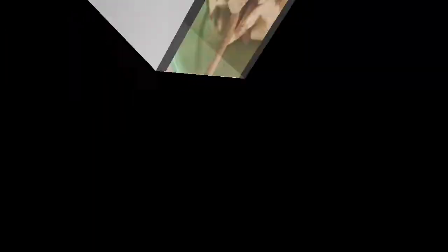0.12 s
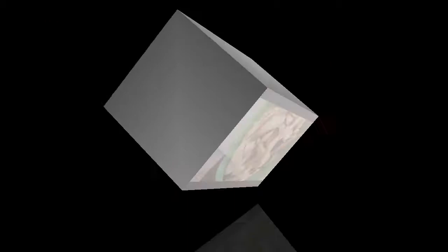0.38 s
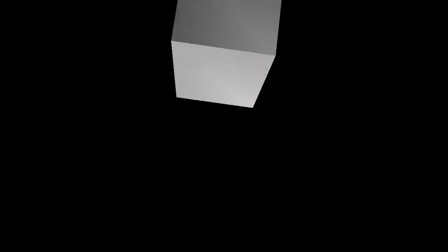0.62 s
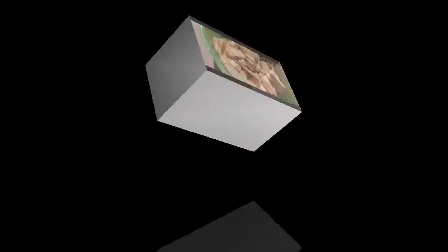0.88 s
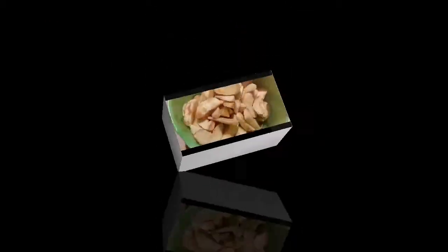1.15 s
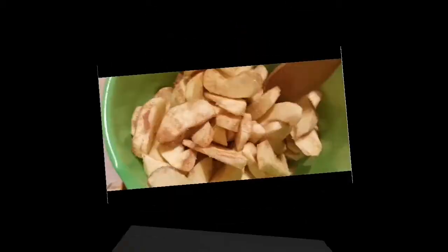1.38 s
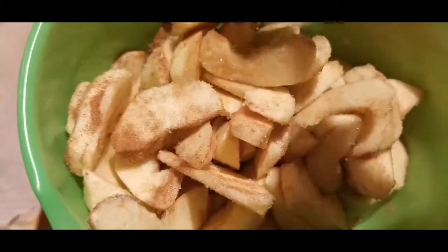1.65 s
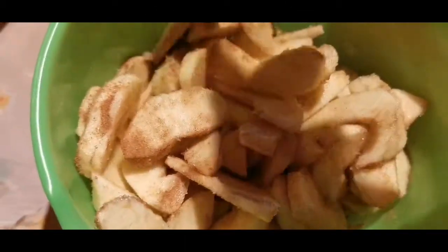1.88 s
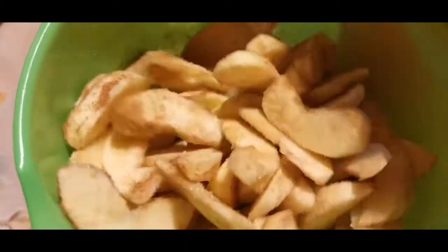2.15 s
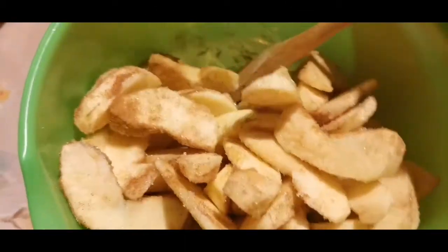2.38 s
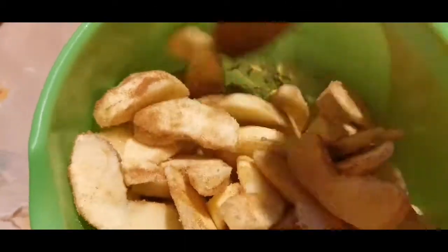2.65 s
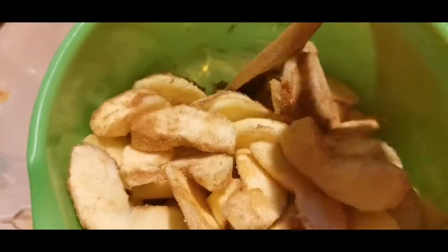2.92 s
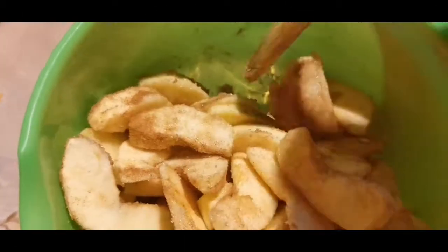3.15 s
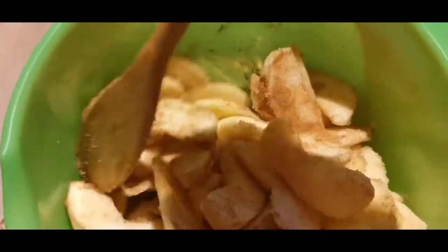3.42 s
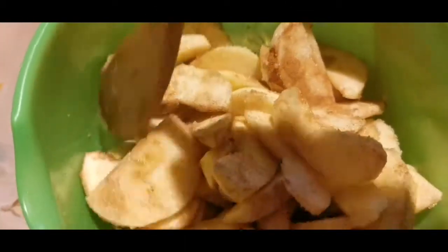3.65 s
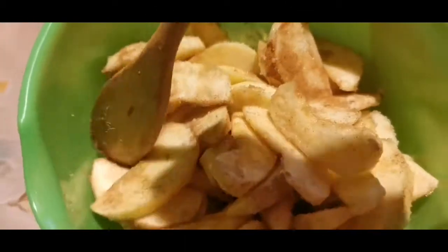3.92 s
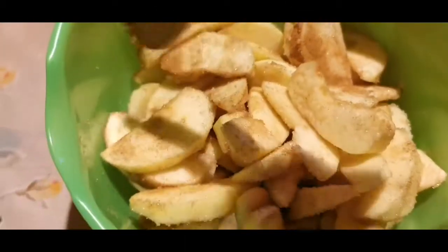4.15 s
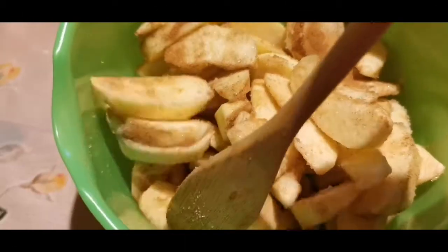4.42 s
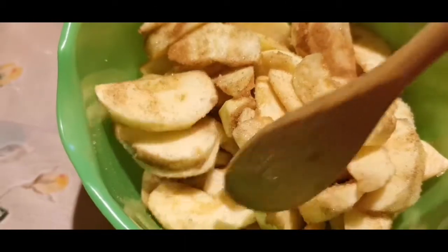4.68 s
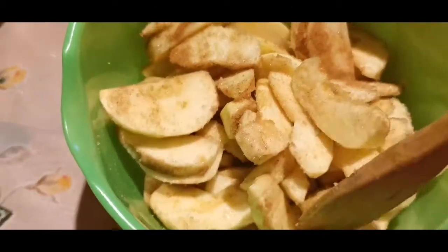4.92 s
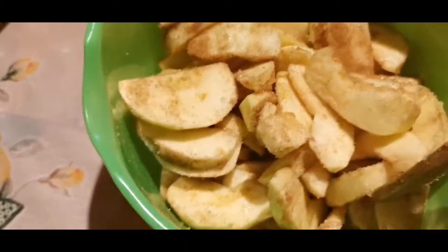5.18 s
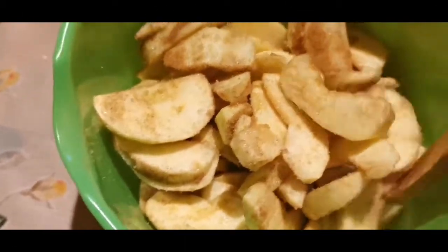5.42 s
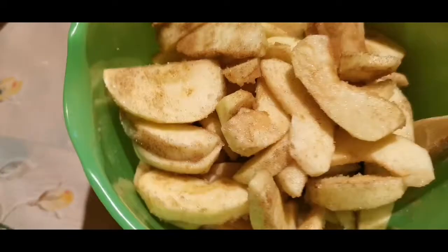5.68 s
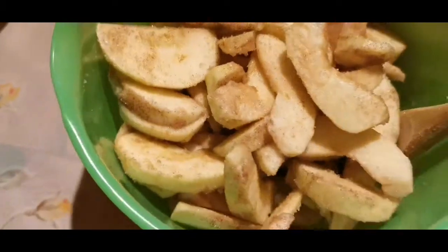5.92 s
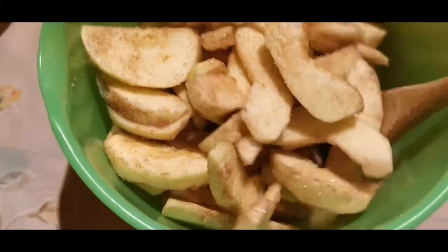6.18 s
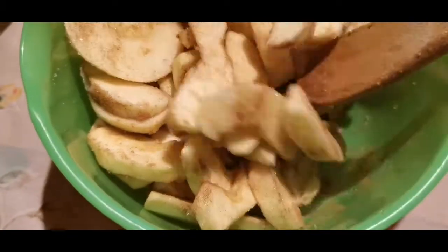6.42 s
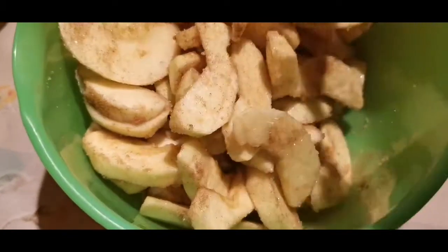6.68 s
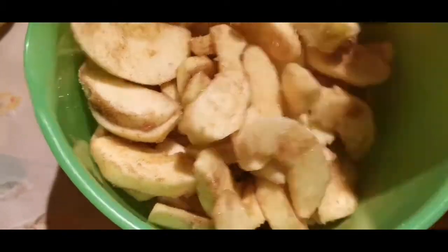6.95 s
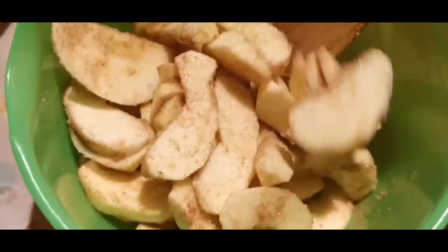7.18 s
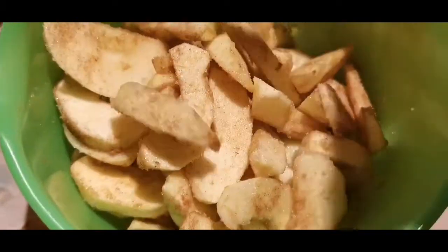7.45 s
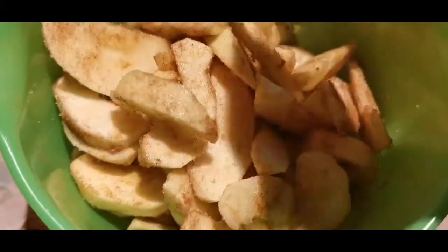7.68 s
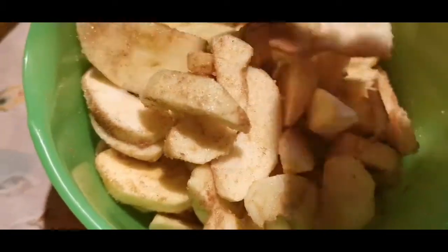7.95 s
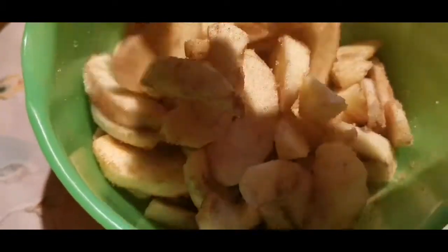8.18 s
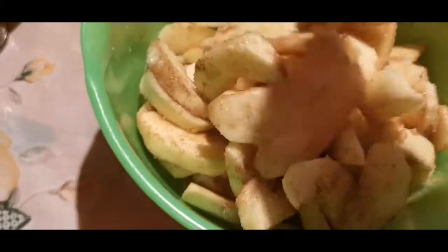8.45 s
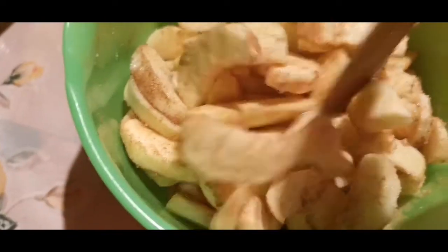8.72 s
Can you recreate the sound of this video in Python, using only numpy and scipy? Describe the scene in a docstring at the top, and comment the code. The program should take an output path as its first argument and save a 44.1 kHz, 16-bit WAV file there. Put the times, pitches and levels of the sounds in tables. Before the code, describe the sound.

A wooden spoon stirs sugary apple slices in a plastic bowl, with gritty rasps, soft scrapes and hollow irregular knocks in a quiet kitchen.

```python
"""Faint kitchen noise comes first, then rasps and knocks: a wooden spoon stirs sugared apple in a plastic bowl.
Rubs are random grain impulses filtered by bowl, wall and sugar; knocks are sums of decaying modes with noise.
Crushed lumps and cracking crystals are short noise bursts; a wet slice squeaks as a wavering tone.
A close phone hears the bowl at two ports, with a small lag and a colour of their own."""
import sys
import numpy as np
from scipy import signal
from scipy.fft import rfft, irfft, next_fast_len
from scipy.io import wavfile
from scipy.ndimage import uniform_filter1d, map_coordinates

SR = 44100
rng = np.random.default_rng(int(sys.argv[2]) if len(sys.argv) > 2 else 0)


def log_audio(samples):
    """Write samples as a 16-bit WAV file to the path given in sys.argv[1]."""
    # one column per channel
    frames = np.atleast_2d(samples).T
    # limit to full scale, then quantise
    limited = np.clip(frames, -1, 1)
    pcm = np.round(limited * 32767).astype(np.int16)
    wavfile.write(sys.argv[1], SR, pcm)


def gain_from_db(level_db):
    """Convert decibel levels to linear amplitude factors (20 dB per decade)."""
    decades = np.asarray(level_db, float) / 20
    return 10 ** decades


N = 389403

# Kitchen and microphone noise, relative spectrum: (frequency [Hz], density [dB per Hz])
NOISE_SPECTRUM = [(15, -31.5), (35, -16), (170, -29), (600, -25), (3500, -41), (16000, -43)]
# Reverberation of the kitchen: (frequency [Hz], t60 [s])
ROOM_DECAY = [(300, 0.37), (1300, 0.17), (10000, 0.062)]
# Colour difference of the ports: (frequency [Hz], left over right [dB])
PORT_COLOUR = [(300, -3), (700, -5), (1400, 3), (4000, 3), (13000, -9.5)]
# Wet slice squeaking on plastic: (time [s], mean pitch [Hz], mean level [dB])
SQUEAK_PATH = [(4.531, 3200, -48), (4.543, 2350, -37), (4.56, 3500, -45), (4.572, 2150, -41),
               (4.589, 2750, -35), (4.6, 2300, -43), (4.614, 2900, -48)]
# Modes of the base, of the air in the bowl, of the wall, and of the table: (frequency [Hz], t60 [s])
BASE_MODES = [(310, 0.026), (420, 0.026), (530, 0.028)]
AIR_MODES = [(678, 0.024)]
WALL_MODES = [(1250, 0.017), (1900, 0.0076)]
TABLE_MODES = [(175, 0.074)]
# Upper wall resonances: (frequency [Hz], width [Hz], level [dB])
RIM_PEAKS = [(2077, 110, 4), (2646, 720, 8), (4900, 1600, -4)]
# Colour of sugar crystals: (frequency [Hz], density [dB per Hz])
SUGAR_SPECTRUM = [(1800, -16), (3500, -12), (6900, -8.5), (8000, -13.5), (10700, -12.5), (12500, -21),
                  (14500, -19), (16000, -24)]
# Spoon and slices strike the bowl:
# (time [s], ring level before height loss [dB], height from base 0 to rim 1 [-], click level [dB])
KNOCK_EVENTS = [(0.344, -54.5, 0.073, -71), (0.6754, -42.5, 0.14, -46), (0.9226, -12.5, 0.98, -31.5),
                (1.1305, -32.5, 0.75, -60), (1.3491, -18.5, 0.33, -30.5), (1.6882, -16, 0.74, -37.5),
                (1.939, -27, .6, -20.5), (2.02, -28.5, 0.5, -20.5), (2.064, -30, 0.42, -35),
                (2.117, -27, 0.46, -40.5), (2.412, -27, 0.39, -45), (2.6, -24, 0.77, -88),
                (2.754, -36, 0.22, -36.5), (2.994, -9.5, 0.38, -13.5), (3.013, -20.5, 0.74, -35),
                (3.1727, -9.5, 0.96, -24.5), (3.4297, -34.5, 0.14, -23), (3.75, -50.5, .05, -66),
                (3.9568, -32.5, 0.23, -53.5), (4.493, -35, 0.033, -43), (4.7121, -28, 0.028, -36),
                (5.3806, -27, 0.6, -28), (5.5616, -26, .03, -37), (5.5891, -18.5, 0.37, -43),
                (5.6146, -26.5, 0.53, -22.5), (5.794, -31, 0.89, -36.5), (5.824, -34, 0.091, -48),
                (5.9925, -29.5, 0.43, -38), (6.135, -20, 0.27, -44), (6.2897, -16.5, 1, -51),
                (6.6284, -29.5, 0.23, -31), (6.8779, -11, 0.95, -22), (6.9745, -25.5, 0.41, -18.5),
                (7.0487, -9, 0.82, -29), (7.1603, -2.5, 0.35, -15), (7.3708, -34, 0.48, -34.5),
                (7.389, -38, 0.029, -62), (7.7027, -28, 0.51, -40), (7.773, -21, 1, -39),
                (8.2522, -42, .03, -34)]
# Sugar lumps crushed: (time [s], crunch level [dB])
CRUNCH_EVENTS = [(1.9731, -20.5), (2.018, -19.5), (2.8447, -20.5), (4.19, -31.5), (5.479, -26),
                 (5.59, -20.5), (5.6161, -21.5), (6.191, -35), (6.8788, -24), (7.7006, -20), (7.7731, -20),
                 (7.8225, -19)]
# Rubs over the sugar:
# (start [s], length [s], hiss level at start [dB], swell by the end [dB], bowl rumble over hiss [dB])
RUB_EVENTS = [(0.184, 0.068, -71.5, 2, -15), (0.47, 0.1, -76, 13, -25), (0.667, 0.15, -78, 8, -15),
              (0.928, 0.02, -66, 1.5, 25), (0.964, 0.072, -60, 10, 1.5), (1.131, 0.053, -61, 7, 6),
              (1.261, 0.12, -59, 2.5, 4), (1.359, 0.16, -58, -1.5, -15), (1.573, 0.13, -71, 13.5, -5.5),
              (1.962, 0.11, -46, 3, -1.5), (2.12, 0.096, -51, 11.5, 2), (2.23, .13, -46, -2.5, 9),
              (2.457, 0.14, -55, 10.5, -6.5), (2.743, 0.058, -54.5, -7, 1), (2.787, 0.21, -63.5, 24, 1.5),
              (3.111, 0.03, -58.5, 15, -2), (3.441, 0.12, -51.5, 10, -0.5), (3.703, 0.06, -58, 2, -7.5),
              (3.924, 0.092, -60, 14, -4.5), (4.066, 0.1, -65.5, 10.5, 0), (4.424, 0.16, -56, 10.5, 1),
              (4.705, 0.18, -57, 1.5, -9.5), (4.93, 0.3, -60, 0.3, -12), (5.309, 0.037, -70.5, 18.5, -11.5),
              (5.462, 0.047, -52, 5.5, -6), (5.528, 0.064, -54, 17, -5), (5.675, 0.13, -44.5, -2, 4),
              (5.988, 0.32, -62, -7.5, 4), (6.283, 0.088, -57.5, 6.5, -3.5),
              (6.385, 0.25, -49.5, -16.5, -9), (6.594, 0.034, -59.5, 9, -7), (6.892, 0.082, -58, 21, -3),
              (7.04, 0.38, -54, 0, -1), (7.71, 0.086, -51, 10.5, -9.5), (7.852, 0.21, -57, 1.5, -11.5),
              (8.245, 0.13, -56, 6, -2), (8.41, 0.45, -52.5, -12, -8)]

NOISE_DB = -72  # mean level of the background
PORT_LAG_S = 0.00015  # the right port hears the bowl later
AIR_HEIGHT, WALL_HEIGHT = 0.47, 0.64  # where a blow best excites air and wall
MISS_DB = 91  # loss per squared distance from the best height; doubled for the wall below it
RIM_THUD_DB = -30  # thud of a blow at the rim, over its ring level
GRIT_DB, SNAP_DB = -14.5, -6.5  # a knock's crunch over its click; a lump's click over its crunch
TABLE_DB = -6.5  # table over thud, when thud is the strongest part of the blow
MODE_SHIFT = 0.015  # standard deviation of a mode's frequency, as a share of it
GRIP_DB_PER_S, HISS_FADE_DB_PER_S, RUMBLE_FADE_DB_PER_S = 1513, 260.5, 203
SETTLE_DB, SETTLE_DB_PER_S = -15, 105  # slices settle after a rub: onset and rate of fall
TICKS_PER_S, TICK_DB, TICK_FOLLOWS = 26, 2, 0.8  # TICK_FOLLOWS: dB of tick per dB of hiss


def unit(x):
    """Normalisation: the signal is scaled to rms 1."""
    return x / np.sqrt(np.mean(x ** 2) + 1e-20)


def along(points, hz):
    """Logarithmic interpolation of (Hz, value) points over frequency."""
    f, v = np.transpose(points)
    return np.interp(np.log(hz + 1), np.log(f + 1), v)


def wobble(rate):
    """Band-limited fluctuation: a smooth curve through random knots, rate of them a second."""
    return map_coordinates(rng.standard_normal(int(N * rate / SR) + 4), [np.arange(N) * rate / SR])


def filtered(x, response):
    """Linear filtering: the spectrum is multiplied by a complex response of frequency."""
    m = next_fast_len(x.shape[-1] + 8192)
    return irfft(rfft(x, m) * response(np.fft.rfftfreq(m, 1 / SR)), m)[..., :x.shape[-1]]


def resonances(peaks):
    """Modal superposition: causal second-order (Hz, width, dB) resonances with alternating sign."""
    def response(f):
        total = 0
        for k, (centre, width, db) in enumerate(peaks):
            damping = 1j * f * width
            total = total + (-1) ** k * gain_from_db(db) * damping / (centre * centre - f * f + damping)
        return total
    return response


def as_peaks(modes, db):
    """Reciprocity of decay and bandwidth: a mode with a short t60 is a wide peak."""
    return [(hz, np.log(1000) / np.pi / t60, db) for hz, t60 in modes]


def sugar(f):
    """Spectral shaping: the magnitude response of crushed crystals."""
    return gain_from_db(along(SUGAR_SPECTRUM, f))


def grains(rate, spread_db, bed, alike):
    """Granular excitation: uneven random impulses over noise, partly shared by the ports."""
    heights = np.minimum(rng.exponential(size=(3, N)), 5)
    sizes = gain_from_db(spread_db * heights) * rng.standard_normal((3, N))
    impulses = unit(sizes * (rng.random((3, N)) < rate / SR))
    own = impulses + bed * rng.standard_normal((3, N))
    return np.sqrt(alike) * own[0] + np.sqrt(1 - alike) * own[1:]


def patchy(x, depth_db):
    """Contact variability: each small contact has its own random gain in time and frequency."""
    z = signal.stft(x, nperseg=256)[2]
    field = uniform_filter1d(rng.standard_normal(z.shape[1:]), size=3, axis=0)
    field = uniform_filter1d(field, size=4, axis=1)
    return unit(signal.istft(z * gain_from_db(depth_db * unit(field)), nperseg=256)[1][:, :N])


def background():
    """Stationary noise: coloured noise of each port, plus a part below 300 Hz common to both."""
    noise = rng.standard_normal((3, N))
    colour = lambda f: gain_from_db(along(NOISE_SPECTRUM, f))
    own = filtered(noise[1:], colour)
    common = filtered(noise[0], lambda f: colour(f) * (f < 300))
    return gain_from_db(NOISE_DB + 1.5 * wobble(1)) * unit(own + common)


def kitchen(x):
    """Diffuse reverberation: a fresh random tail in which each frequency decays at its own rate."""
    hz, t, z = signal.stft(rng.standard_normal(x.shape), SR, nperseg=256)
    z[1] += (z[0] - z[1]) * (hz < 900)[:, None] * 0.6  # low tones reach both ports more alike
    decay = gain_from_db(-60 * t / along(ROOM_DECAY, hz)[:, None])
    tail = signal.istft(z * decay, SR, nperseg=256)[1]
    delayed = np.pad(x, ((0, 0), (250, 0)))
    return signal.fftconvolve(delayed, tail / np.linalg.norm(tail[0]), axes=1)[:, :x.shape[1]]


def ports(x):
    """Two-point reception: colour and lag split between ports; the ports pass no deep bass."""
    side = np.array([[0.5], [-0.5]])
    low_cut = lambda f: (1j * f / (110 + 1j * f)) ** 2
    colour = lambda f: gain_from_db(side * along(PORT_COLOUR, f))
    lag = lambda f: np.exp(2j * np.pi * f * side * PORT_LAG_S)
    return filtered(x, lambda f: low_cut(f) * colour(f) * lag(f))


def squeak():
    """Frictional oscillation: a wavering slip tone and its octave, midway between the ports."""
    s, hz, db = np.transpose(SQUEAK_PATH)
    t = np.arange(N) / SR
    pitch = np.interp(t, s, hz) * (1 + 0.06 * wobble(700))
    phase = 2 * np.pi * np.cumsum(pitch) / SR
    level = np.interp(t, s, db, left=-120, right=-120) + 3 * wobble(500)
    return gain_from_db(level) * (np.sin(phase) + 0.2 * np.sin(2 * phase))


def ticks(hiss_db):
    """Random brittle fracture: single crystals crack, in pauses too, and louder while sugar hisses."""
    cracks = gain_from_db(rng.normal(0, 4, N)) * (rng.random(N) < TICKS_PER_S / SR)
    t = np.arange(SR // 100) / SR
    pulse = t / 0.00085 * np.exp(1 - t / 0.0011)
    burst = rng.standard_normal((2, N)) * signal.fftconvolve(cracks, pulse)[:N]
    bright = lambda f: sugar(f) + gain_from_db(-20.0) * resonances(RIM_PEAKS)(f)
    return filtered(burst * gain_from_db(TICK_DB + TICK_FOLLOWS * np.maximum(hiss_db, -75)), bright)


def blows():
    """Modal participation: (s, click, thud, air, wall, crunch dB) from place and strength of contact."""
    near = lambda height, best: -MISS_DB * (height - best) ** 2
    none = -120
    contacts = []
    for s, db, height, click_db in KNOCK_EVENTS:
        thud_db = db + max(near(height, 0), RIM_THUD_DB * height)
        air_db = db + near(height, AIR_HEIGHT)
        wall_db = db + near(height, WALL_HEIGHT) * (2 if height < WALL_HEIGHT else 1)
        contacts.append((s, click_db, thud_db, air_db, wall_db, click_db + GRIT_DB))
    for s, db in CRUNCH_EVENTS:
        contacts.append((s, db + SNAP_DB, none, none, none, db))
    return contacts


def ring(modes, db, t):
    """Free vibration: decaying sines whose level and frequency vary a little from blow to blow."""
    total = 0
    for hz, t60 in modes:
        envelope = gain_from_db(db + rng.normal(0, 2) - 60 * t / t60)
        total = total + envelope * np.sin(2 * np.pi * hz * rng.normal(1, MODE_SHIFT) * t)
    return total


def knocks():
    """Impact excitation: a blow rings table, base, air and wall, clicks the rim and crushes sugar."""
    t = np.arange(SR // 2) / SR
    soft_contact = 1 - np.exp(-(t / 0.00062) ** 2)
    out = np.zeros((2, N + len(t)))
    for s, click_db, thud_db, air_db, wall_db, crunch_db in blows():
        # the table sounds under a blow that mostly thuds
        table_db = thud_db - 2 * (max(thud_db, air_db, wall_db) - thud_db) + TABLE_DB
        body = ring(TABLE_MODES, table_db, t) + ring(BASE_MODES, thud_db, t) + ring(AIR_MODES, air_db, t)
        body = body * soft_contact + ring(WALL_MODES, wall_db, t) * (1 - np.exp(-t / 0.00028))
        noise = rng.standard_normal((2, 3, len(t)))
        click, crunch = noise[:, :1] + 1.3 * noise[:, 1:]  # the ports share the first noise
        click = filtered(click * gain_from_db(-60 * t / 0.016), resonances(RIM_PEAKS))
        click = click * gain_from_db(click_db) / np.abs(click).max()
        crunch = unit(filtered(crunch, sugar)) * gain_from_db(-60 * t / 0.022) * (1 - np.exp(-t / 0.0022))
        hit = body + click + crunch * gain_from_db(crunch_db)
        out[:, round(s * SR):][:, :len(t)] += hit + gain_from_db(-13.0) * kitchen(hit)
    return out[:, :N]


def rubbing(fade_db_per_s, extra_db):
    """Addition of powers: level in dB of all rubs, each with bite, swell, fade and soft settling."""
    t, power = np.arange(N) / SR, np.full(N, 1e-12)
    for (s, length, db, swell_db, _), extra in zip(RUB_EVENTS, extra_db):
        after = t - s - length
        swell = swell_db * np.clip((t - s) / length, 0, 1)
        bite = GRIP_DB_PER_S * np.maximum(s - t, 0)
        fade = fade_db_per_s * np.maximum(after, 0)
        settle = np.minimum(swell_db + SETTLE_DB - SETTLE_DB_PER_S * after, 0)
        power += gain_from_db(db + extra + swell - bite - fade) ** 2
        power += (t > s + length) * gain_from_db(db + extra + settle) ** 2
    return 10 * np.log10(power)


def bowl(rise):
    """Modal superposition: table, base, air and wall, with the air tuned by the factor rise."""
    air = np.multiply(AIR_MODES, [rise, 0.9])
    low = as_peaks(TABLE_MODES, -10) + as_peaks(BASE_MODES, -10)
    return resonances(low + as_peaks(air, 0) + as_peaks(WALL_MODES, -8.5))


def strokes(hiss_db):
    """Stick-slip friction: rumble follows pressure, hiss follows speed, wall rasp needs both."""
    rumble_db = rubbing(RUMBLE_FADE_DB_PER_S, np.transpose(RUB_EVENTS)[-1])
    rasp_db = 0.53 * rumble_db + 0.5 * hiss_db - 1.0
    slip = lambda: 1.5 * wobble(25) + 2.4 * wobble(140)  # dB; each layer slips on its own
    shake = grains(830, 0.46, 0.46, alike=0.95)
    heap = np.pi / 4 * (1 + np.tanh(wobble(14)))  # moving fruit retunes the air
    rumble = np.cos(heap) * filtered(shake, bowl(1)) + np.sin(heap) * filtered(shake, bowl(1.08))
    rumble = unit(rumble) * gain_from_db(rumble_db + 2 * wobble(45))
    rasp = filtered(grains(1500, 2.6, 0.8, alike=0.25), resonances(RIM_PEAKS))
    rasp = patchy(rasp, depth_db=4) * gain_from_db(rasp_db + slip())
    hiss = filtered(grains(1500, 6.1, 1.62, alike=0.065), sugar)
    hiss = patchy(hiss, depth_db=2.0) * gain_from_db(hiss_db + slip())
    return rumble + rasp + hiss


def scene():
    """Superposition: background, squeak, and the bowl's sounds as the two ports hear them."""
    hiss_db = rubbing(HISS_FADE_DB_PER_S, np.zeros(len(RUB_EVENTS)))
    return background() + squeak() + ports(ticks(hiss_db) + knocks() + strokes(hiss_db))


def roll_off(x):
    """The treble ends steeply here."""
    return signal.sosfilt(signal.butter(12, 16050, fs=SR, output="sos"), x)


def record(dry):
    """Phone recording: the finished mix as the phone stores it."""
    return roll_off(dry)


dry = scene()
out = record(dry)
log_audio(out)
```